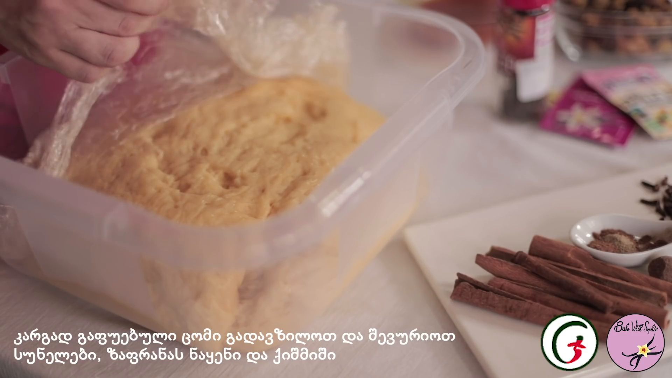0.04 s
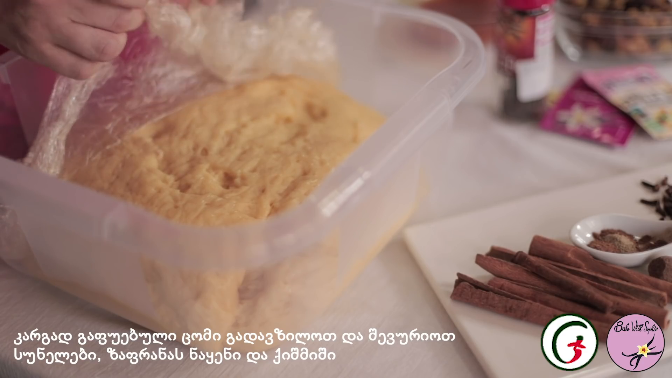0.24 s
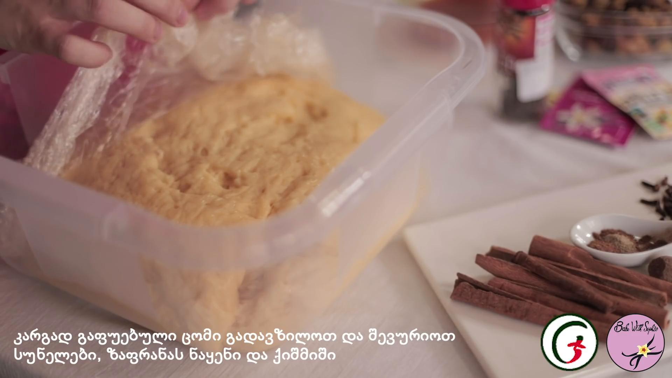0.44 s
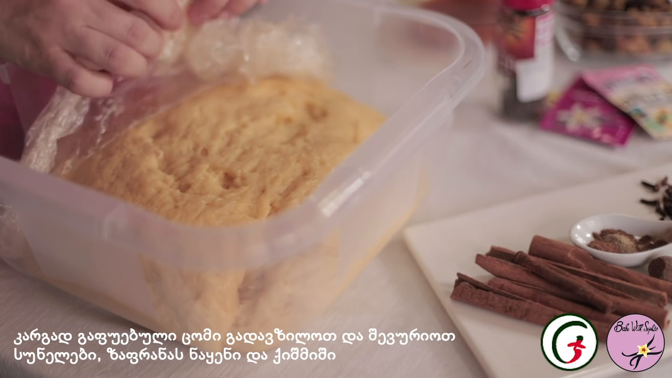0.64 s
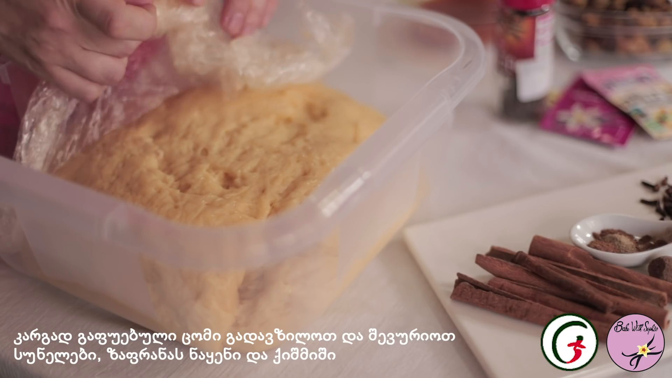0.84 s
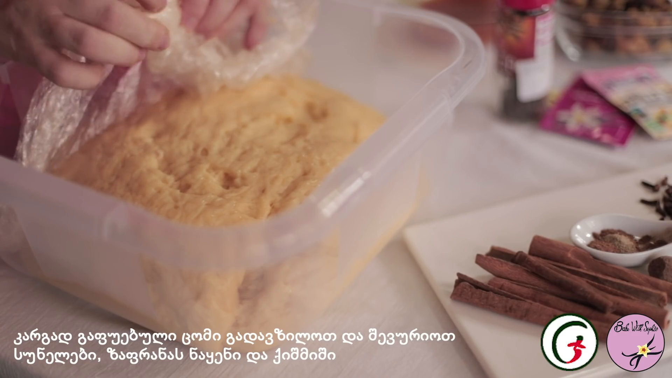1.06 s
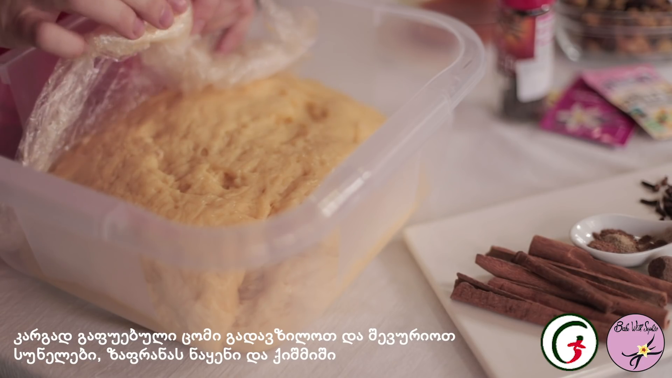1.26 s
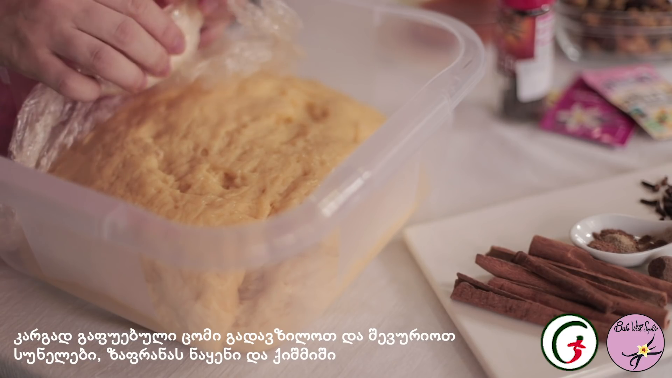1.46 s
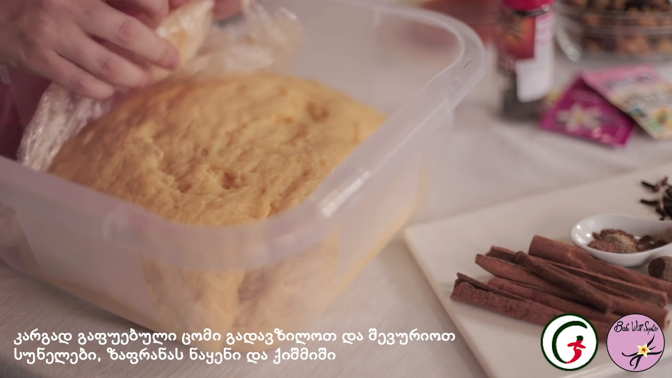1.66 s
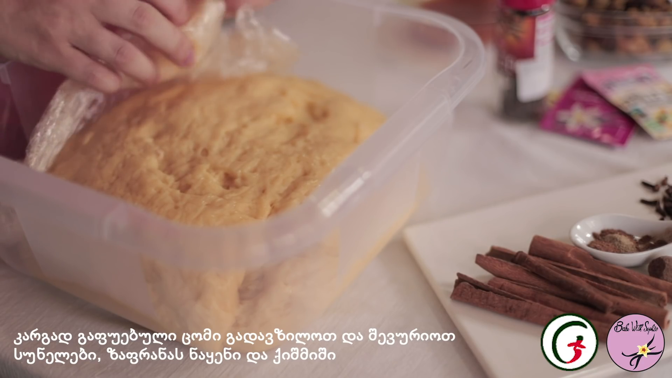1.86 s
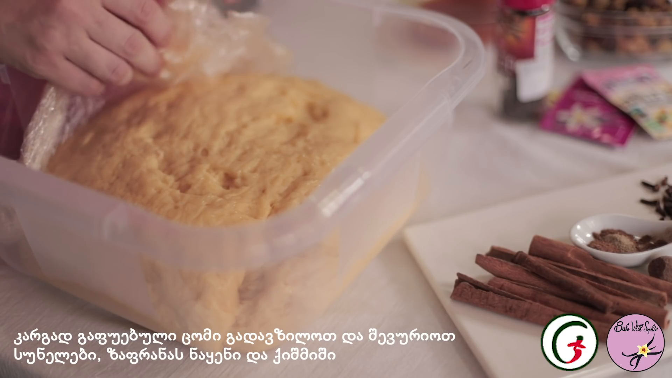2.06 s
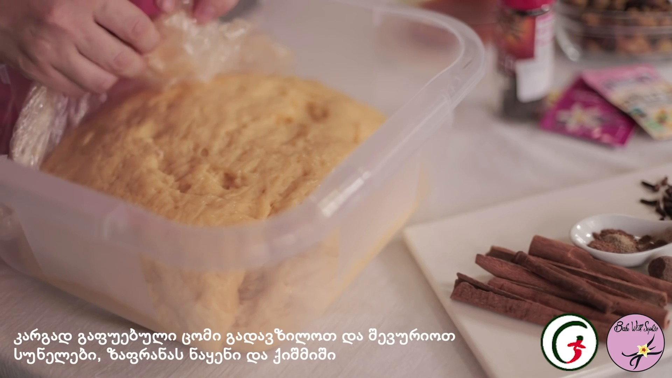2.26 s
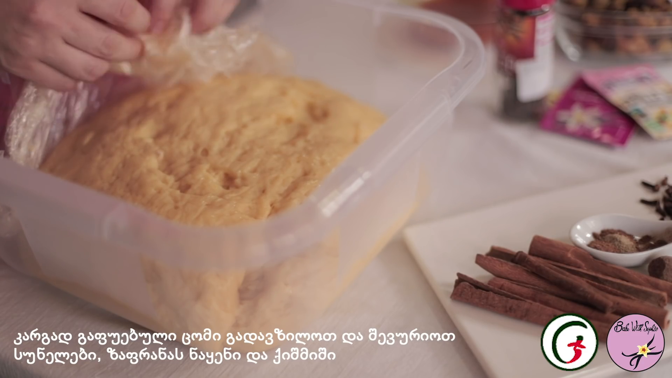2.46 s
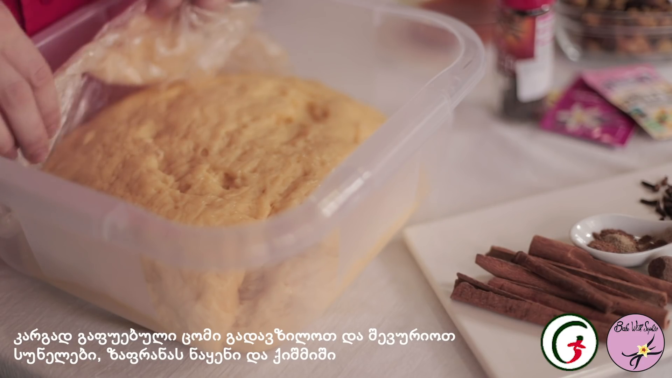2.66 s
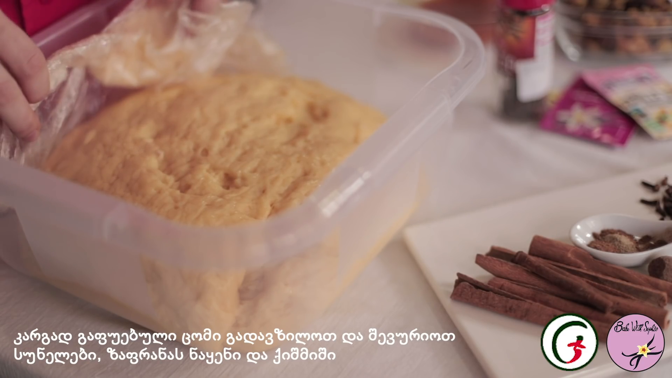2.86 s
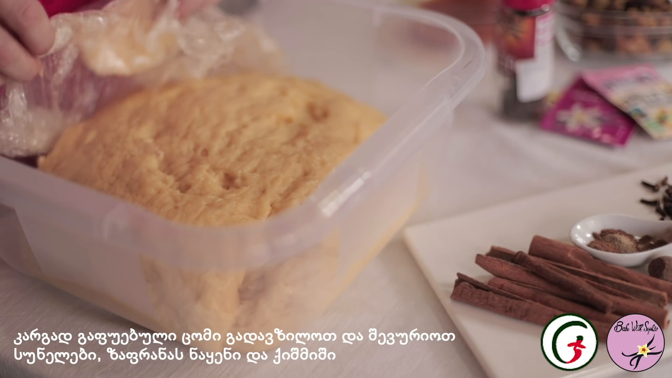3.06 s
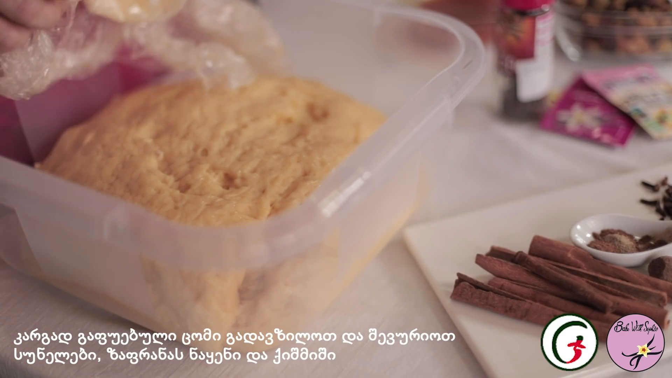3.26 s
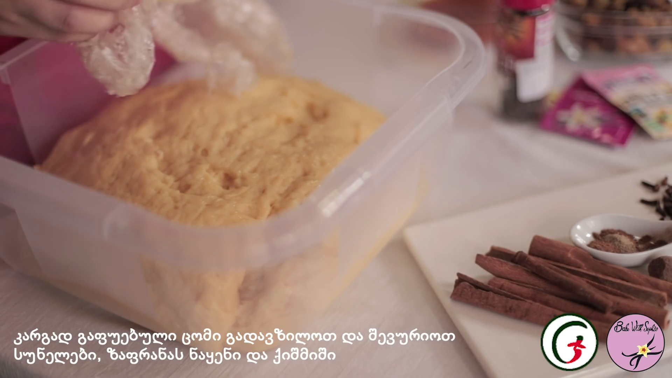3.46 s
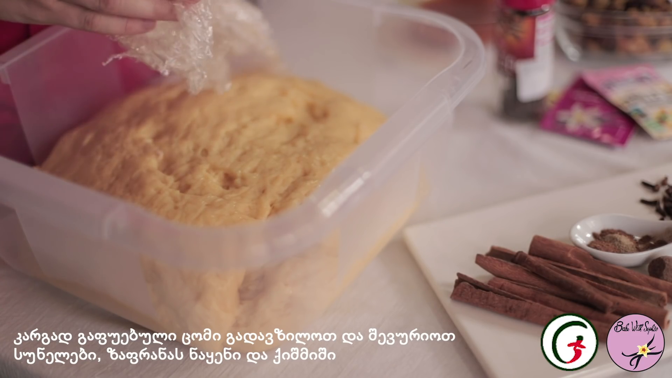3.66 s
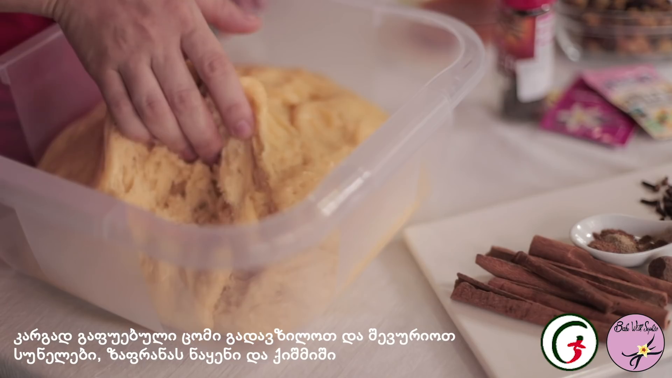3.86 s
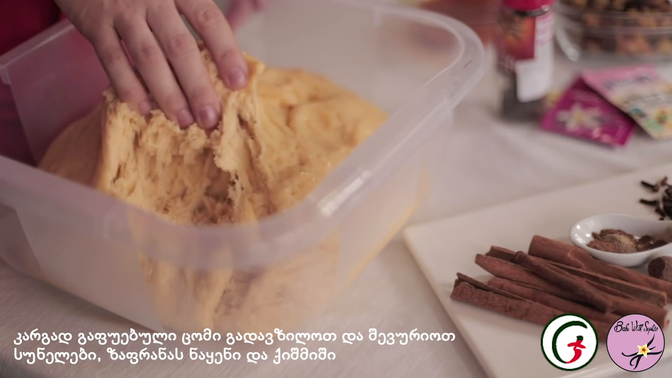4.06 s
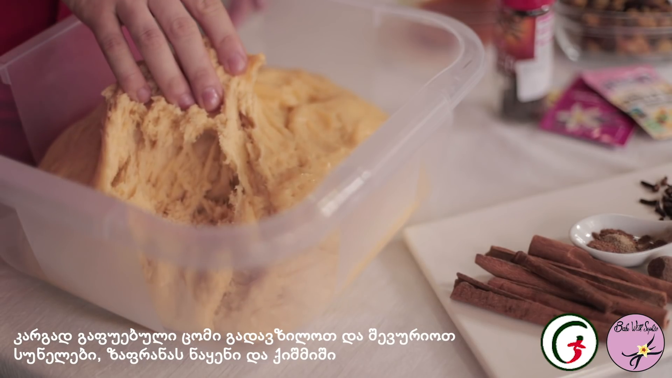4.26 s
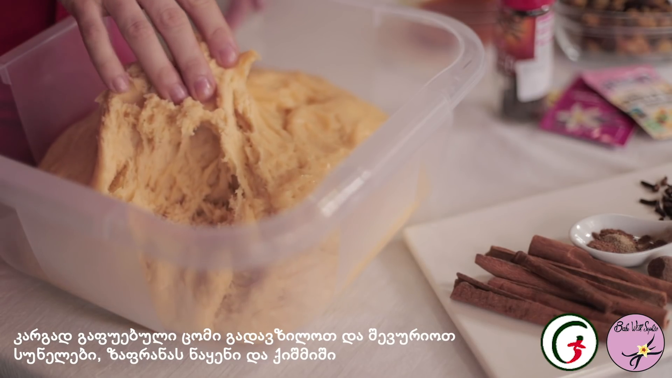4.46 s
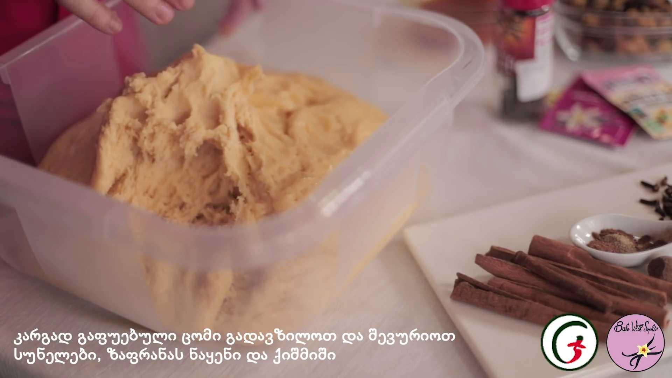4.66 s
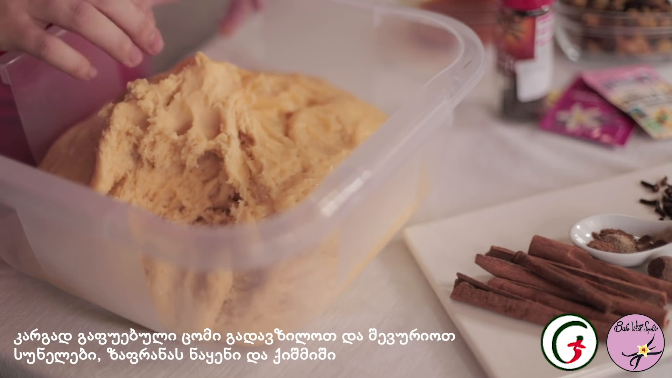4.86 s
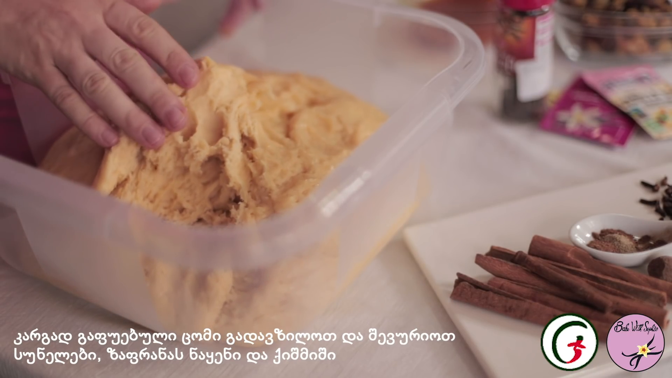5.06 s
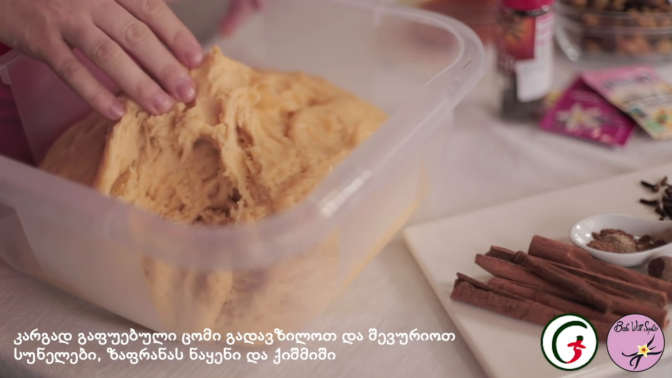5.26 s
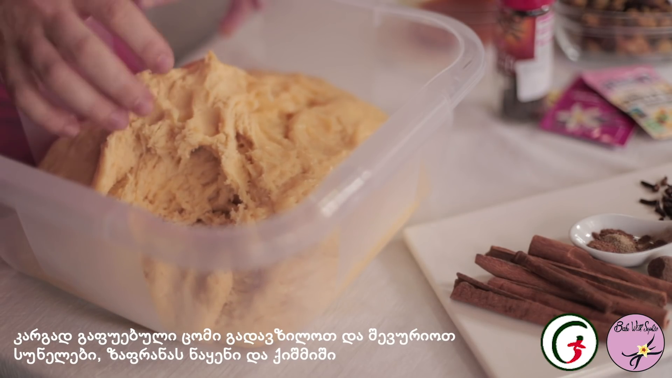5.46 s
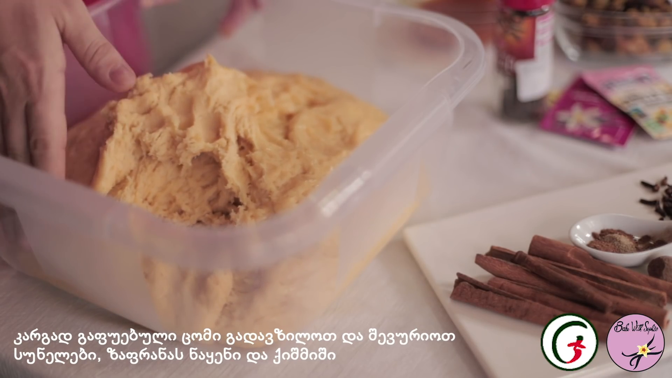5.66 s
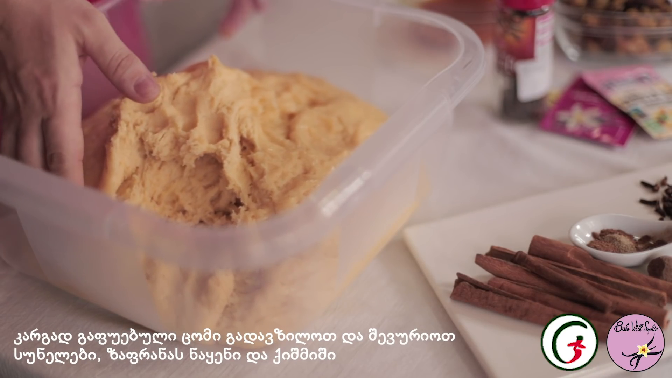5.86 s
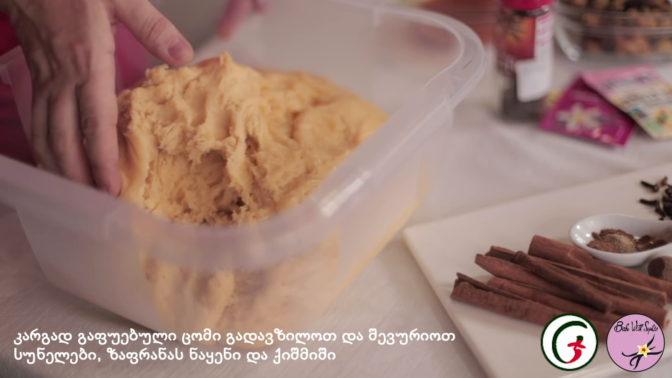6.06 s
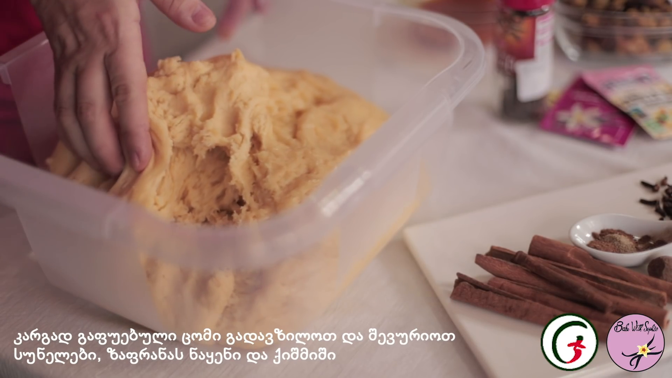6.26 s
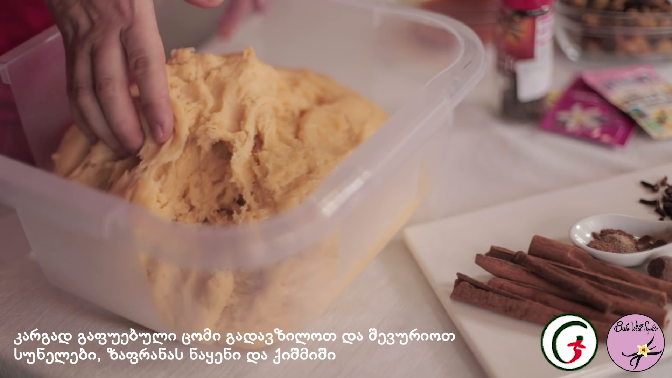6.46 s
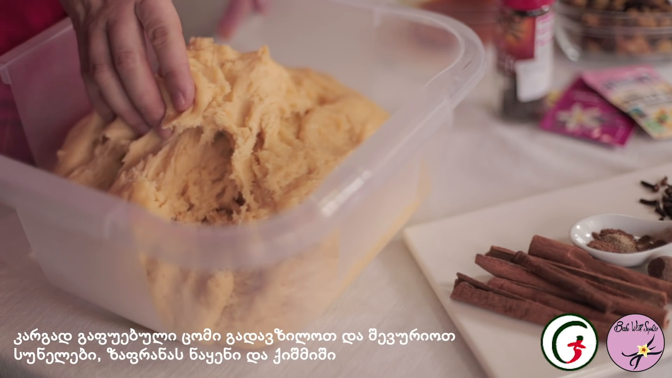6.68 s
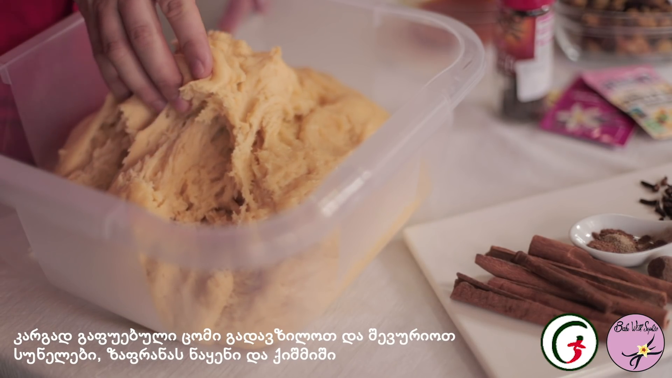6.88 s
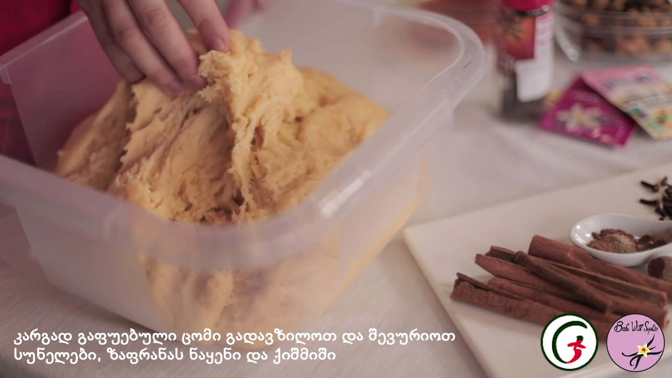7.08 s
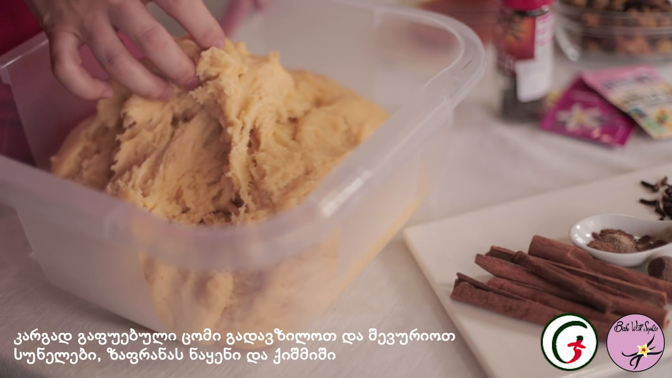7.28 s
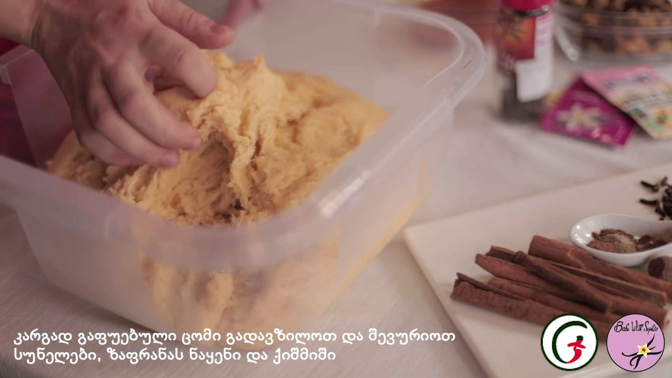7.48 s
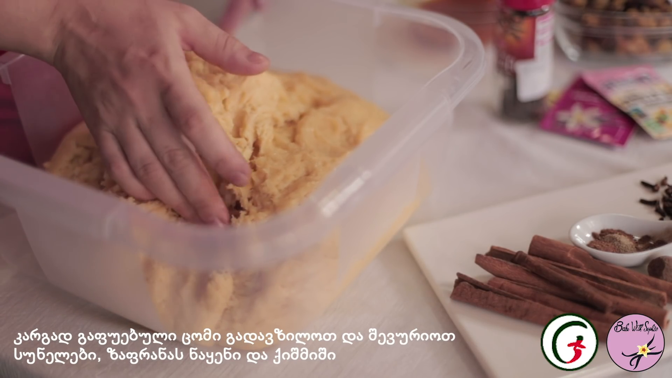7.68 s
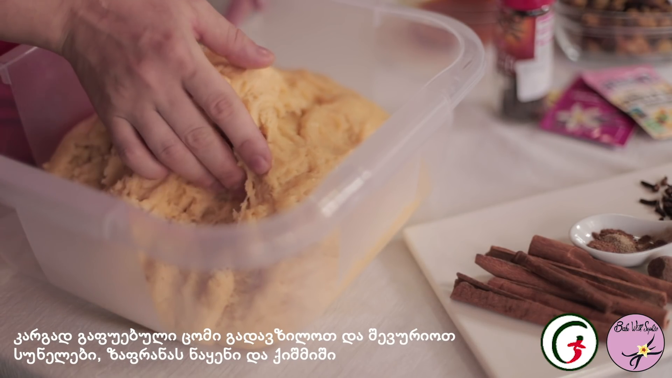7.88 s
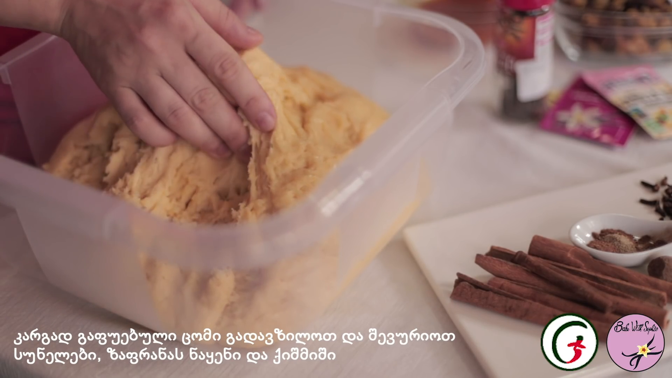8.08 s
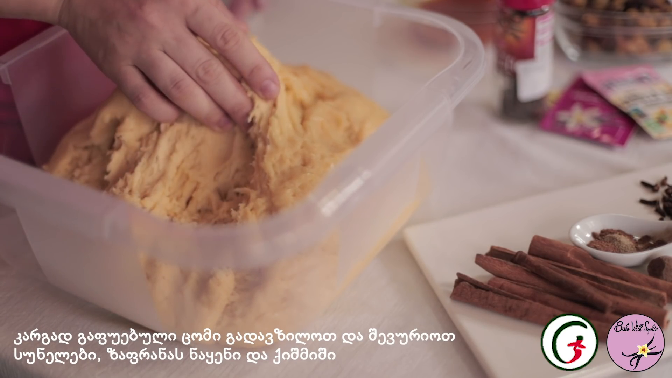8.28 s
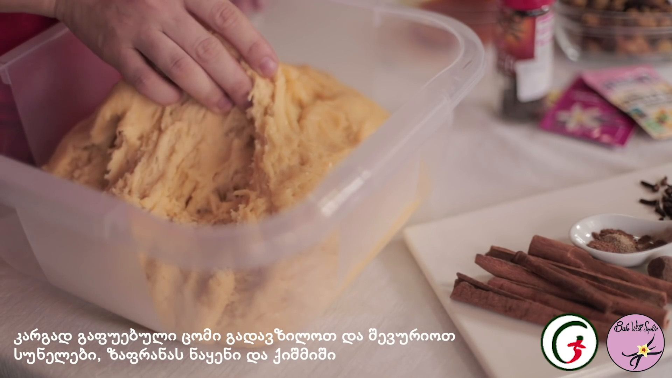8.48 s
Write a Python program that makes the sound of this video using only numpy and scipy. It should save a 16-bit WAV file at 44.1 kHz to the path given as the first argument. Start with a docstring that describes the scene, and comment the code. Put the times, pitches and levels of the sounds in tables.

```python
"""A quiet kitchen, with steady room noise and droning appliances, heard nearly in mono.
Hands pull plastic film off a tub of dough: the film buckles in countless tiny clicks and larger
folds snap over. The crinkle stops abruptly and fingers press and peel the sticky dough, whose threads
and gas pockets pop. Shoves make the tub rumble on the table; knocks ring the modes of its walls."""
import sys
import numpy as np
from scipy import signal
from scipy.io import wavfile

SR = 44100
rng = np.random.default_rng(int(sys.argv[2]) if len(sys.argv) > 2 else 0)


def store_wav(level_fs):
    """Save 16-bit WAV to argv[1]."""
    pcm = np.round(np.clip(np.atleast_2d(level_fs), -1, 1) * 32767)
    wavfile.write(sys.argv[1], SR, pcm.T.astype(np.int16))


N = 376173

# Spectra of room noise, hiss, dough crackle and film crackle: frequency_hz, density_db
ROOM_SPECTRUM = [(18, -10), (35, -9), (190, -9), (320, -2.5), (570, -5), (1200, -9), (2300, -13),
                 (15800, -19.5)]
HISS_SPECTRUM = [(25, 0), (130, 0), (800, -14.5), (1600, -28), (4000, -32), (15800, -20)]
DOUGH_SPECTRUM = [(300, -50), (700, -13.5), (1230, -4.5), (1900, -3), (2600, 0), (3400, 4.5), (4300, 1.5),
                  (5300, 6), (6000, 0.5), (7200, -3), (11200, 1), (15800, -3)]
FILM_SPECTRUM = [(150, -51), (280, -2), (630, -3), (930, 2), (1570, 1.5), (2500, 0), (3450, 4),
                 (4200, -0.5), (5200, 3.5), (5900, -2), (7000, -7.5), (11000, -5), (14200, -7.5),
                 (15800, -12)]
# Drone tones of the appliances: pitch_hz, level_db
DRONE_TONES = [(50, -67.5), (97, -68.5), (146, -76), (522, -73), (555, -68.5), (598, -76)]
# Shoves that rock the tub on the table: start_s, hold_s, rumble_db, thump_db
TUB_SHOVES = [(0.02, 0.098, -56, -67), (2.744, 0.066, -53.5, -79), (3.3, .05, -65, -63),
              (3.93, 0.31, -59, -56), (4.72, 0.23, -50, -57), (5.34, 0.044, -56, -57),
              (5.71, 0.061, -53, -60), (5.945, .4, -59.5, -60.5), (6.45, 0.65, -63, -66),
              (7.537, 0.048, -59.5, -61)]
# Modes of the tub walls: pitch_hz, gain_db, t60_s
TUB_MODES = [(156, 5, 0.13), (270, 9, 0.099), (313, 12.5, 0.034), (544, -0.5, 0.051), (746, -9, 0.035),
             (976, -19, 0.055), (1230, -11, 0.02), (1610, -6, 0.024), (2900, -7, 0.012),
             (3900, -9.5, 0.012), (5750, -5, 0.0021)]
# Knocks on the tub: start_s, level_db, deep_mode_gain_db
TUB_KNOCKS = [(3.926, -38.5, -20), (4.016, -39, -16), (4.044, -39.5, -18), (4.175, -39, -25),
              (4.28, -40.5, -25), (5.692, -24.5, -12.5), (6.23, -44.5, -14)]
# Finger strokes on dough and tub wall: start_s, hold_s, level_db, low_gain_db, fizz_gain_db
DOUGH_STROKES = [(3.91, 0.086, -49, 9, -2.5), (4.1, 0.17, -59.5, 6, 0.5), (4.58, 0.14, -51, 17, -2.5),
                 (5.4, 0.088, -67.5, 0, 10), (5.72, 0.13, -63, 22, -5), (6.04, 0.26, -52, 8.5, 1.5),
                 (6.42, 0.18, -57, 8, 3), (6.8, 0.56, -56.5, 2.5, -1), (7.46, 0.22, -57, 17, -2),
                 (7.95, 0.16, -52.5, -2, 3), (8.2, 0.28, -58, 4, 0)]
# Loudest pops of dough threads and gas pockets: start_s, level_db, pitch_hz, fizz_gain_db
DOUGH_POPS = [(3.9635, -38, 2020, -18), (4.0155, -40, 1820, -12), (4.1537, -36.5, 5170, -7),
              (4.1755, -40, 2100, -15), (4.2795, -38, 2280, -11), (5.2894, -40.5, 3300, -9),
              (5.8145, -38, 3870, -16), (6.0925, -36, 5250, -11), (6.1785, -39.5, 1330, -12),
              (6.2149, -30.5, 3830, -22), (6.2831, -32, 5600, -10), (6.3265, -35.5, 5500, -1),
              (6.3793, -39.5, 5530, 0), (6.4779, -39, 5380, -8), (6.5333, -39, 6330, 2),
              (6.5816, -43, 4760, -5), (6.625, -42, 3040, 2), (6.8684, -40, 4950, -1),
              (6.9533, -34.5, 5000, -15), (7.0263, -42, 3240, -5), (7.2808, -46, 3150, 5),
              (7.377, -40, 3100, -14), (8.0009, -40, 3560, 10), (8.0375, -28.5, 3600, -20),
              (8.0478, -31.5, 3650, -18), (8.0773, -40, 2650, -15), (8.1029, -41, 4940, 4),
              (8.1288, -40, 3400, -6), (8.1773, -36.5, 4630, -16), (8.2689, -36.5, 3440, 4),
              (8.4264, -38, 5040, -14)]
# Tugs at the film: start_s, hold_s, level_db, low_gain_db
FILM_TUGS = [(.02, 0.052, -34, -2), (.125, 0.014, -35, 5), (.2, 0.074, -39.5, -4), (.34, 0.15, -42.5, 0.5),
             (.7, 0.062, -43, 0), (.83, 0.1, -37.5, -1.5), (1.02, 0.2, -39, 0), (1.36, 0.35, -39, -3),
             (1.82, 0.05, -42, 2), (2.02, 0.13, -40.5, 4), (2.3, .17, -42.5, -5), (2.56, 0.024, -35.5, 0.5),
             (2.86, 0.17, -35.5, -6.5), (3.1, 0.12, -36, -6), (3.27, 0.043, -35.5, 3),
             (3.45, 0.17, -49.5, 0), (3.65, 0.1, -38.5, -1.5), (3.8, 0.084, -34, -5.5)]
# Loudest folds that snap over: start_s, level_db, pitch_hz, fizz_gain_db
FILM_SNAPS = [(0.0365, -24, 3600, -14), (0.05, -21, 4180, -14), (0.0712, -13.5, 3040, -14),
              (0.0796, -12.5, 4820, -10), (.0903, -18, 5490, -13), (0.123, -14, 4900, -11),
              (.1251, -16, 4830, -23), (0.13, -17, 5000, -19), (0.1342, -24, 1090, -20),
              (0.1466, -13, 3570, -11), (0.2077, -17, 3620, -18), (0.2145, -21, 3660, -18),
              (0.2612, -24, 5330, -15), (0.4373, -26, 4700, -25), (.6907, -15.5, 4430, -2.5),
              (0.8322, -24, 3200, 8), (0.8504, -26.5, 1810, -13), (.9196, -22, 3420, -18),
              (1.0117, -24, 4800, -18), (1.134, -20.5, 3600, -8), (1.1486, -24, 2050, -19),
              (1.1846, -22, 3550, -22), (1.3437, -21, 4370, -17), (1.3994, -22.5, 3400, -17),
              (1.4576, -25, 3340, -14), (1.4692, -25.5, 1680, -9), (1.5233, -21.5, 5000, -7),
              (1.5475, -22, 5260, -9), (1.7946, -28.5, 1870, -6), (1.8962, -23, 1270, -20),
              (2.0628, -25, 4160, -14), (2.0815, -23, 4620, -6), (2.125, -22.5, 4470, -11),
              (2.567, -31, 3570, -13), (2.5735, -22, 5230, -11), (2.865, -21, 1870, -9),
              (2.901, -18, 4130, -11), (2.9293, -13, 5600, -12), (2.96, -20.5, 2880, 0),
              (3.0553, -18, 5380, -8), (3.1156, -18.5, 3740, -10), (3.135, -19, 5260, -4),
              (3.1486, -20.5, 2200, -16), (3.2774, -16.5, 4200, -4), (3.2849, -19.5, 1950, -14),
              (3.642, -23, 3230, -20), (3.6846, -24, 3640, -16), (3.7123, -22, 3700, -14),
              (3.7437, -24, 3430, -8), (3.7556, -29, 1140, -20), (3.784, -21, 4970, -13),
              (3.81, -27, 3900, -14), (3.8731, -14, 4070, -3), (3.893, -20, 4750, -12)]

DOUGH_START_S = 3.912
CONTROL_STEP = 64  # samples between envelope points


def gain_of(db):
    """Amplitude grows tenfold every 20 dB."""
    return 10 ** (np.asarray(db) / 20)


def unit_rms(x):
    """Normalisation to unit mean power."""
    return x / np.sqrt(np.mean(x ** 2) + 1e-20)


def add(mix, start_s, sound):
    """Superposition: a sound sums into the mix from its onset."""
    part = mix[round(start_s * SR):][:len(sound)]
    part += sound[:len(part)]


def coloured(x, spectrum):
    """Minimum-phase filtering: the Hilbert transform of the log gain gives a causal response."""
    points_hz, points_db = np.transpose(spectrum)
    hz = abs(np.fft.fftfreq(8192, 1 / SR))
    log_gain = np.log(gain_of(np.interp(np.log(hz + 1), np.log(points_hz + 1), points_db)))
    taps = np.fft.ifft(np.exp(np.conj(signal.hilbert(log_gain)))).real[:4096]
    return signal.oaconvolve(x, taps)[:len(x)]


def band(x, low_hz, high_hz):
    """Causal band-pass filtering."""
    return signal.sosfilt(signal.butter(2, [low_hz, high_hz], "band", fs=SR, output="sos"), x)


def below(x, hz):
    """Zero-phase low-pass filtering."""
    return signal.sosfiltfilt(signal.butter(2, hz, fs=SR, output="sos"), x)


def band_noise(low_hz, high_hz):
    """Band-limited Gaussian fluctuation of unit power."""
    return unit_rms(band(rng.standard_normal(N), low_hz, high_hz))


def ring(hz, t60_s, phase=0):
    """Free vibration of a damped mode: a sinusoid with exponential decay."""
    t = np.arange(round(t60_s * SR) + 2) / SR
    return gain_of(-60 * t / t60_s) * np.sin(2 * np.pi * hz * t + phase)


def wash(x, gain_db, t60_s):
    """Diffuse scattering: nearby surfaces throw back noise that follows the dying power."""
    decay = gain_of(-120 / (t60_s * SR))
    power = signal.lfilter([1 - decay], [1, -decay], x ** 2)
    return gain_of(gain_db) * np.sqrt(power) * rng.standard_normal(N)


def gesture(start_s, hold_s, db, rise_db_per_s, fall_db_per_s):
    """Exponential growth and decay: the power of one movement swells, holds and dies away."""
    t = np.arange(0, N + CONTROL_STEP, CONTROL_STEP) / SR
    rise_db = rise_db_per_s * np.maximum(start_s - t, 0)
    fall_db = fall_db_per_s * np.maximum(t - start_s - hold_s, 0)
    return gain_of(2 * (db - rise_db - fall_db))


def per_sample(envelope):
    """Linear interpolation between envelope points."""
    return np.interp(np.arange(N), np.arange(len(envelope)) * CONTROL_STEP, envelope)


def handling(moves, rise_db_per_s, fall_db_per_s, rest_db):
    """Incoherent addition: gives the summed level in dB, then any tone gains, weighted by power."""
    powers = [gesture(*move[:3], rise_db_per_s, fall_db_per_s) for move in moves]
    powers = np.array(powers + [gesture(0, N, rest_db[0], 0, 0)])
    total = powers.sum(0)
    tone_db = np.array([move[3:] for move in moves] + [rest_db[1:]]).T @ powers / total
    return [per_sample(x) for x in [10 * np.log10(total), *tone_db]]


def hiss():
    """Antiphase noise: opposite signs left and right widen the sound slightly."""
    side = gain_of(-74.5) * unit_rms(coloured(rng.standard_normal(N), HISS_SPECTRUM))
    return np.array([side, -side])


def kitchen():
    """Random modulation: appliance tones waver in level and pitch over steady room noise."""
    out = gain_of(-57.5) * unit_rms(coloured(rng.standard_normal(N), ROOM_SPECTRUM))
    for hz, db in DRONE_TONES:
        waver = gain_of(3.2 * band_noise(0.07, 4.0))
        pitch_hz = hz + 3.9 * band_noise(0.56, 25)
        phase = 2 * np.pi * (np.cumsum(pitch_hz) / SR + rng.random())
        out += np.sqrt(2) * gain_of(db) * waver * np.sin(phase)
    return out


def tub_rumble():
    """Forced vibration: irregular drag shakes the deep modes of tub and table."""
    shoves = np.array(TUB_SHOVES)
    rumble_db, = handling(shoves[:, [0, 1, 2]], 160, 68, rest_db=[-64])
    thump_db, = handling(shoves[:, [0, 1, 3]], 160, 68, rest_db=[-65.5])
    drag = rng.standard_normal(N) * gain_of(0.48 * band_noise(9.3, 23))
    shake = unit_rms(band(band(drag, 105, 276), 105, 276))
    return gain_of(rumble_db) * shake + gain_of(thump_db) * band_noise(30, 107)


def tub_knocks():
    """Modal response: a knock rings the walls, the deep modes most under a full blow; a dull tail follows."""
    out = np.zeros(N)
    for start_s, db, deep_db in TUB_KNOCKS:
        for k, (hz, mode_db, t60_s) in enumerate(TUB_MODES):
            amplitude = (-1) ** k * gain_of(db + mode_db + deep_db * (hz < 400))
            add(out, start_s, amplitude * ring(hz, t60_s))
    return out + band(wash(out, gain_db=7, t60_s=0.37), 180, 1010)


def crackle(level_db, low_db, fizz_db, spectrum, per_s, spread_db, clump_db, cycles, wash_db):
    """Shot noise: tiny buckles of random size come in clumps, each a short ring of its own pitch."""
    sizes = gain_of(spread_db * np.minimum(rng.exponential(1, N), 4))
    impulses = sizes * (rng.random(N) < per_s / SR) * rng.choice([-1, 1], N)
    pitches_hz = np.geomspace(600, 19000, num=16)
    pitch_index = rng.integers(0, len(pitches_hz), N)
    grains = np.zeros(N)
    for k, hz in enumerate(pitches_hz):
        if k % 4 == 0:  # wide and narrow folds crumple in clumps of their own
            clumped = impulses * gain_of(clump_db * band_noise(2.7, 108))
        grain = ring(hz, cycles / hz, np.pi / 2)
        grain *= np.sqrt(hz) / np.linalg.norm(grain)  # even energy per Hz
        grains += np.convolve(clumped * (pitch_index == k), grain[:110])[:N]
    grains = unit_rms(coloured(grains + wash(grains, wash_db, t60_s=0.53), spectrum))
    low, high = below(grains, 1340), grains - below(grains, 7300)
    return gain_of(level_db) * (grains + (gain_of(low_db) - 1) * low + (gain_of(fizz_db) - 1) * high)


def chance_snaps(level_db, span_s, over_db, spread_db, range_hz, fizz_db, count):
    """Random point process: rows of small snaps whose strength follows the given level."""
    when, pitch, size = rng.random((count, 3)).T
    start_s = span_s[0] + (span_s[1] - span_s[0]) * when
    db = level_db[(start_s * SR).astype(int)] + over_db + spread_db * (-np.log(size + 0.057) - 1)
    pitch_hz = range_hz[0] * (range_hz[1] / range_hz[0]) ** pitch
    return [(*row, fizz_db) for row in zip(start_s, db, pitch_hz)]


def snaps(rows, cycles):
    """Impulsive excitation: each snap is a short ring, a bright spit of noise and a quick after-slip."""
    out = np.zeros(N)
    spit_decay = gain_of(-60 * np.arange(200) / SR / 0.004)
    for start_s, db, hz, fizz_db in rows:
        body = band(ring(hz, cycles / hz), 0.55 * hz, 2.2 * hz)
        spit = band(rng.standard_normal(200) * spit_decay, 6000, 16000)
        snap = np.zeros(900)
        add(snap, 0, body / abs(body).max())
        add(snap, 0, gain_of(fizz_db) * spit / abs(spit).max())
        snap *= gain_of(db) * rng.choice([-1, 1])
        add(out, start_s, snap)
        slip_delay_s = rng.uniform(0.00057, 0.00177)
        add(out, start_s + slip_delay_s, -gain_of(-23) * snap)
    return out + band(wash(out, gain_db=2, t60_s=0.03), 1550, 6200)


def sticky_dough():
    """Adhesion: peeling dough gives heavily damped clicks, and its threads and gas pockets pop."""
    level_db, low_db, fizz_db = handling(DOUGH_STROKES, 96, 86, rest_db=(-70.5, 12, 3))
    clicks = crackle(level_db, low_db, fizz_db, DOUGH_SPECTRUM,
                     per_s=7000, spread_db=5.5, clump_db=-0.5, cycles=1.56, wash_db=-4)
    pop_db = level_db - 0.76 * low_db  # dull rubs pop less
    small_pops = chance_snaps(pop_db, (DOUGH_START_S, (N - 1) / SR), over_db=12, spread_db=9.5,
                              range_hz=(3200, 6000), fizz_db=-2, count=110)
    return clicks * (np.arange(N) / SR >= DOUGH_START_S) + snaps(small_pops + DOUGH_POPS, cycles=15.5)


def plastic_film():
    """Buckling: tugged film crinkles in tiny ringing clicks, and its larger folds snap over."""
    level_db, low_db = handling(FILM_TUGS, 195, 150, rest_db=(-45, -2.7))
    crinkle = crackle(level_db, low_db, 0, FILM_SPECTRUM,
                      per_s=7000, spread_db=3, clump_db=2, cycles=5.6, wash_db=-7)
    small_snaps = chance_snaps(level_db, (0, DOUGH_START_S), over_db=7.5, spread_db=3.5,
                               range_hz=(2800, 5800), fizz_db=-36, count=120)
    return crinkle * (np.arange(N) / SR < DOUGH_START_S) + snaps(small_snaps + FILM_SNAPS, cycles=12.5)


def scene():
    """Superposition: every source but the hiss is the same in both channels."""
    return hiss() + kitchen() + tub_rumble() + tub_knocks() + sticky_dough() + plastic_film()


def record(dry):
    """Band limiting: a linear-phase low-pass removes the treble above 15850 Hz."""
    taps = signal.firwin(1023, 15850, window=("kaiser", 9), fs=SR)
    return signal.oaconvolve(dry, taps[None], "same")


dry = scene()
out = record(dry)
store_wav(out)
```